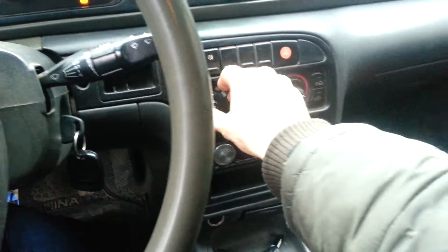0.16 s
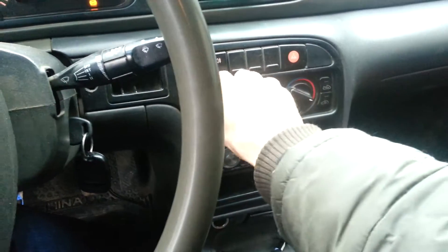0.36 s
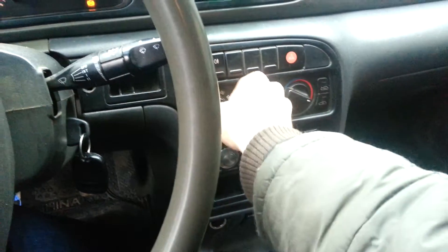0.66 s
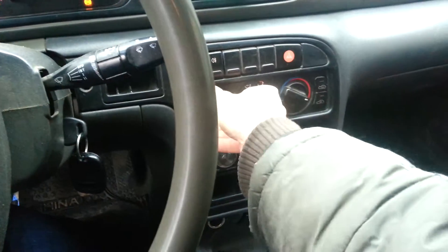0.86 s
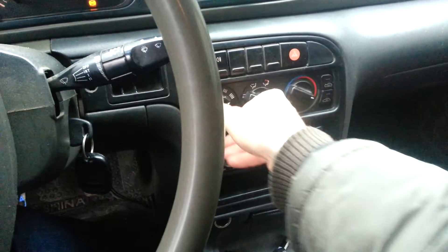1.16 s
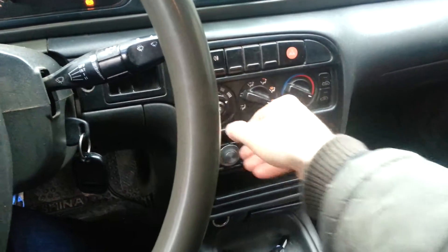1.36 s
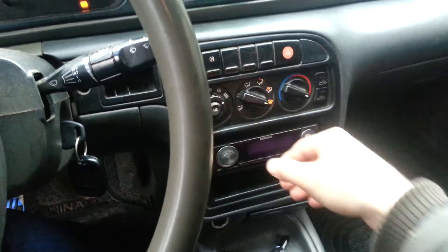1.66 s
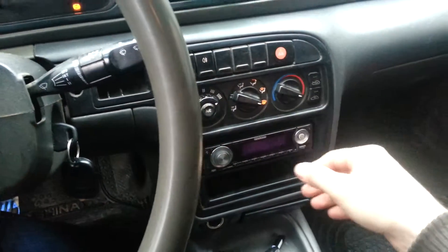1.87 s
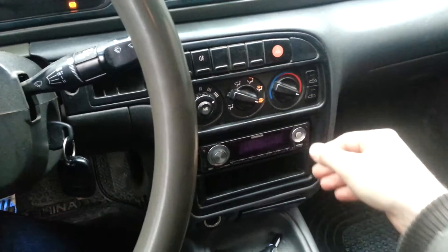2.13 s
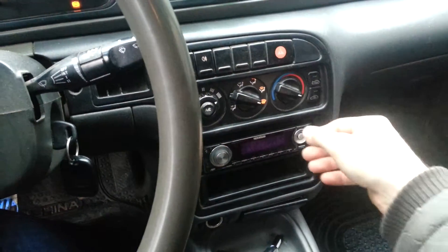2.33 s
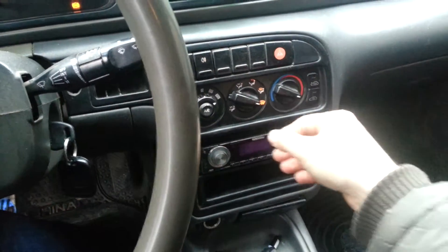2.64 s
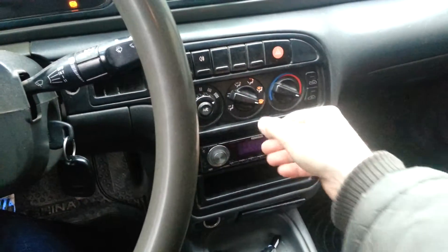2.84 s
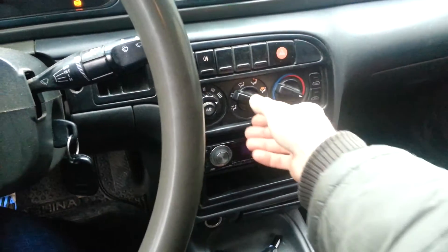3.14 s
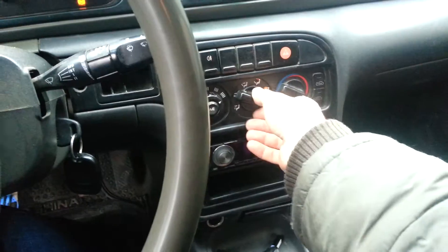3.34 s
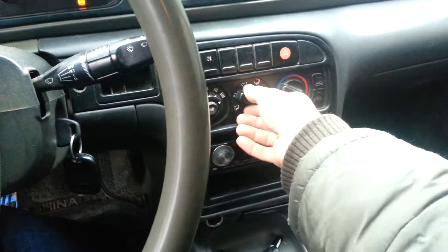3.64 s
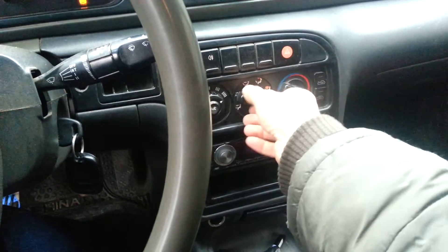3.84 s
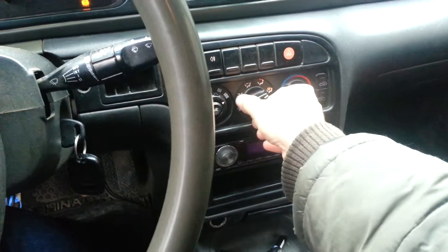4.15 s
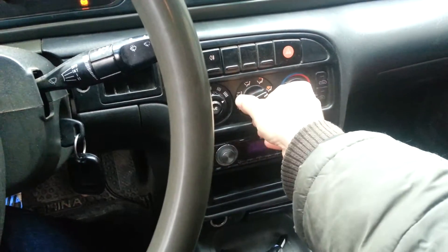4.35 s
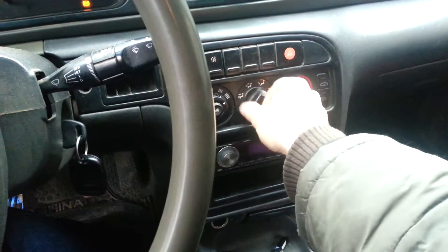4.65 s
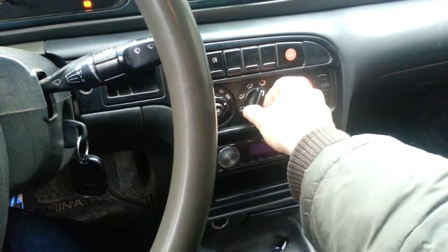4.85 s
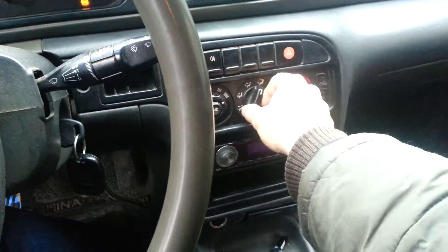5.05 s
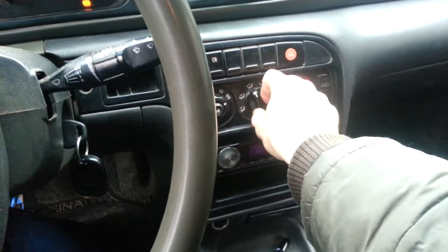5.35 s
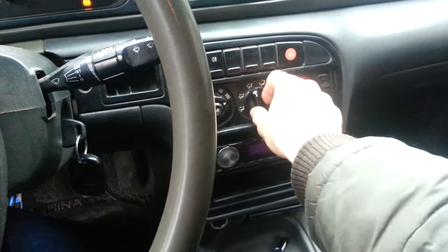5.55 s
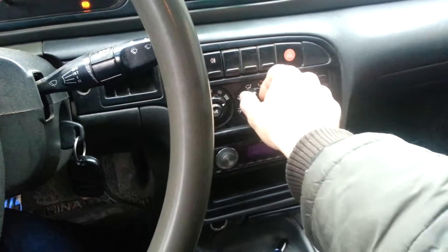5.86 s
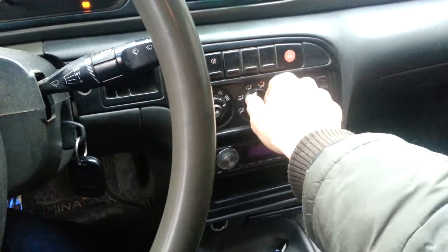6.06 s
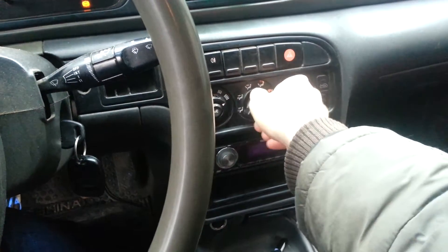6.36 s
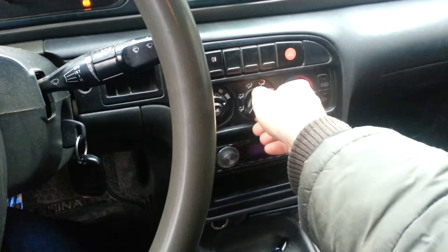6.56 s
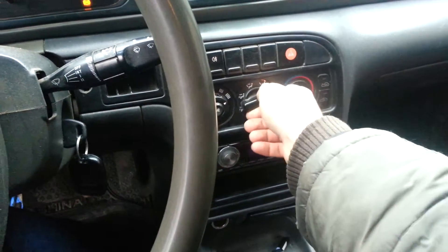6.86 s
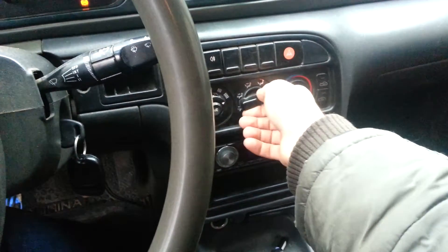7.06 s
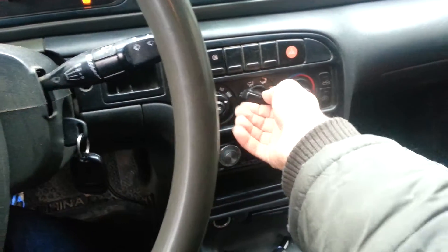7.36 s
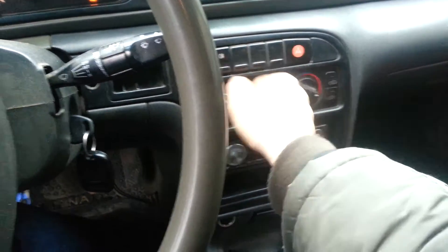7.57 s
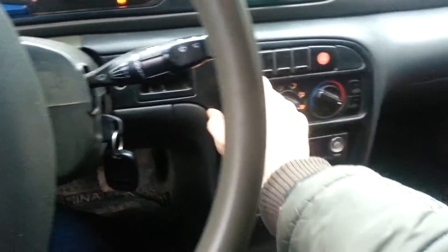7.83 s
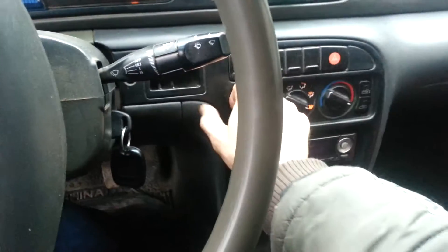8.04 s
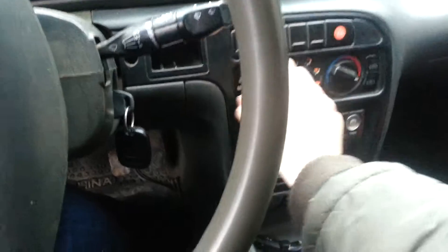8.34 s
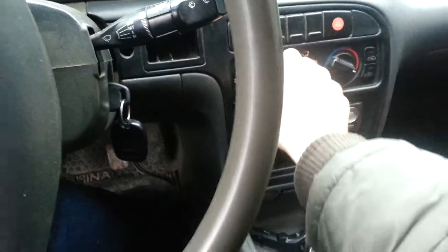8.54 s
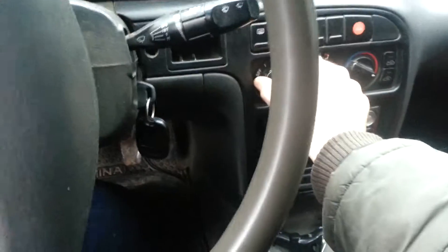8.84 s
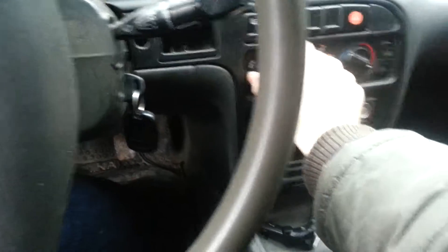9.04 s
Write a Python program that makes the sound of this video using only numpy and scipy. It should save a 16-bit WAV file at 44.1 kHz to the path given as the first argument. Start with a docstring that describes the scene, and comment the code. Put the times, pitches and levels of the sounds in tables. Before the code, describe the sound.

Heard in stereo from the driver's seat, an engine idles with very low, quiet tones under soft cabin noise. At about 0.5, 0.6, 0.7 and 0.8 seconds, four crisp, bright plastic switch clicks sound, each a tight double contact with faint panel thrum. Right after the last, the blower spins up, its pitch gliding upward and settling within about a second into steady hum, broad air rush and light hiss. Small dial ticks begin near 3.8; hard snaps at 3.9, 4.7 and 5.4 carry clustered, hollow flap knocks behind the dashboard, shifting the air's tone. Around 6.2 to 6.5 come ticks, a short scuff, faint spring ping and rattling knocks, with softer knocks at 6.8 and 7.3. The hum changes colour by 7.6; a tiny hard tick falls at 7.7, then a jacket sleeve rustles and fades. A final switch click lands at 9.2, the blower still running.

```python
"""In an idling car, two microphones at the driver's seat hear low engine tones over soft cabin noise. A hand
clicks the fan switch, bursts ringing in its modes; the blower spins up, rotor harmonics over shaped air noise.
Then the vent dial snaps from notch to notch; flaps knock behind the dashboard and share the air out anew. Near
the end the hum's colour shifts, a small hard tick sounds and a jacket sleeve rustles. The hand goes back to the
fan switch for one more click, the blower running on."""
import sys
import numpy as np
from scipy import signal
from scipy.fft import rfft, irfft, next_fast_len
from scipy.io import wavfile
from scipy.ndimage import map_coordinates

SR = 44100
rng = np.random.default_rng(int(sys.argv[2]) if len(sys.argv) > 2 else 0)


def master_out(mix):
    """Clip the mix to full scale and print it as 16-bit PCM to the path in sys.argv[1]."""
    frames = np.transpose(np.atleast_2d(mix))
    ceiling = np.clip(frames, -1, 1)
    pcm = np.round(ceiling * 32767).astype(np.int16)
    wavfile.write(sys.argv[1], SR, pcm)


N = 405719
T = np.arange(N) / SR

# likeness of the two microphones: [f/Hz, correlation 0-1]
LIKENESS = [(40, .95), (100, .975), (290, .94), (640, .78), (1300, .15), (2500, .2), (5000, 0), (15000, 0)]
# left minus right microphone: [f/Hz, level/dB]
BALANCE = [(60, -2.5), (130, 2), (300, 1.5), (700, 1.5), (1100, -3), (1500, -3), (2380, 1), (3100, 3),
           (5000, 5.5), (7000, 7), (8500, 1.5), (10500, -3.5), (12500, -6), (14500, -3)]

# parked cabin, noise spectrum: [f/Hz, relative level/dB per Hz]
CABIN = [(41, -40), (70, -11), (140, -13.5), (180, -5.5), (269, -4.5), (301, -10), (377, -7.5), (480, -7.5),
         (605, -10.5), (647, -10), (866, -12), (1590, -21), (1820, -16), (2030, -22.5), (6110, -29),
         (11000, -30.5), (13700, -31), (15000, -49)]
# tones of the idling engine: [f/Hz, rms level/dB]
IDLE = [(30.5, -60.5), (49.8, -64.5), (61, -59), (91.5, -60.5), (122, -61), (183, -65), (305, -51.5),
        (352, -61), (608, -65)]

# air noise of each duct: [f/Hz, relative level/dB per Hz]
FACE_VENTS = [(50, -24), (100, -13.5), (142, 0), (168, -12.5), (200, -4.5), (240, -2), (400, -4.5),
              (480, -13.5), (600, -6.5), (700, -11.5), (780, -10), (900, -13.5), (1120, -13.5), (1450, -22),
              (2450, -32.5), (3000, -31.5), (8000, -76)]
FOOTWELL = [(50, -31), (100, -2), (138, 2), (168, -13.5), (240, 0), (330, -7.5), (440, -8.5), (560, -14),
            (700, -17), (820, -9.5), (1080, -22), (1550, -23.5), (2400, -35), (3000, -34), (8000, -49)]
GRILLE_HISS = [(1000, -26), (1380, -16), (1480, 0), (1600, -6), (1900, 1), (2170, -7), (2470, 1.5),
               (2680, -11), (3760, -9), (4250, -7), (4600, -4.5), (5000, -9), (5610, -11), (6730, -8),
               (7500, -9.5), (9000, -10.5), (10200, -15), (12400, -21), (13400, -22), (14600, -30),
               (15000, -36)]
HISS_WAVER_DB, HISS_WAVERS_PER_S = 0.72, 12  # turbulence at the grille
# the motor gets current just after the fourth switch step; time constant of its spin-up
MOTOR_ON_S, SPIN_UP_S = 0.8, 0.232
# running speed of the blower: [t/s, speed/turns per s]
RUNNING_SPEED = [(2, 48.95), (6.7, 48.85), (7.6, 49.35), (9.2, 49.6)]
# harmonics of the turning wheel: [multiple of the speed, relative level/dB, change at full shift/dB]
ROTOR_ORDERS = [(2, -13.5, 0), (3, -11, -14), (4, -6, 4.5), (5, 1.15, 0), (6, -4, -1.5), (8, -13.5, -1),
                (10, -13, 0)]
# the hum's colour shifts late in the scene: fourth harmonic stronger, # third much weaker: [t/s, share 0-1]
HUM_SHIFT = [(7.25, 0.1), (7.6, 0.83)]
# resonance of the wheel's housing: [f/Hz, gain/dB]
HOUSING = [(70, -8), (98, 0), (122, -2), (137, 6), (147, 0), (162, -9), (181, -4), (196, 0), (225, 0),
           (245, 0), (270, 2), (294, 0)]

# what each dial position lets through, face to feet: [hum/dB, face vents/dB, footwell/dB], relative
VENT_SETTINGS = [(-33.5, 2.5, -12.5), (-35.5, -4, -1), (-38.5, -3.5, 0.5), (-37.5, -4, -0.5)]
# dial positions in turn, three up and back again: [row of VENT_SETTINGS]
DIAL_PATH = [0, 1, 2, 3, 2, 1, 0]
# moments at which the flaps swing over: [t/s]
FLAP_SWINGS = [3.944, 4.71, 5.356, 6.406, 6.804, 7.308]
FLAP_TRAVEL_S = 0.025

# a flap's seal scuffs: [t/s, rise/s, relative level/dB]
FLAP_SCUFFS = [(6.349, 0.03, -31), (7.038, .03, -37), (7.248, 0.05, -34)]
SCUFF_RELEASE_S = 0.03
# flaps and linkage hit their stops: [t/s, relative level/dB, brightness/dB per octave]
FLAP_KNOCKS = [(3.9445, -18, 5.5), (3.957, -26, 4), (3.95, -21, -1.5), (3.975, -19, 2), (3.983, -21.5, 2.5),
               (3.993, -26, -1), (4.022, -21.5, 0.5), (4.053, -29, -4.5), (4.694, -18.5, 0),
               (4.7075, -13.5, 3.5), (4.718, -19.5, 4), (4.729, -24, -2), (4.754, -19.5, 2.5),
               (4.784, -23, 1), (4.849, -29, -1.5), (5.321, -31.5, 7), (5.36, -25, 0), (5.373, -24, 1),
               (5.383, -21.5, 4.5), (5.398, -23.5, 3), (5.415, -23, 5), (5.423, -25.5, 4.5),
               (5.437, -29, 2.5), (6.178, -29, 3), (6.384, -25, 2.5), (6.397, -20.5, 3.5), (6.404, -17, -3),
               (6.4105, -16, 2), (6.415, -21, 5.5), (6.437, -22.5, 0), (6.444, -21, -1), (6.483, -33, 7),
               (6.507, -25.5, -2), (6.804, -21.5, 3.5), (6.811, -26, 2), (7.309, -20.5, 0), (7.317, -28, 2),
               (7.329, -31, 3.5)]
# dense ringing of the flaps, dulled by the dashboard: [f/Hz, relative level/dB per Hz]
FLAP_BODY = [(60, -41), (140, -2), (300, 7), (600, -0.5), (700, -2), (880, 0), (1200, -7), (1550, -11.5),
             (2300, -16), (3100, -25.5), (7000, -37.5), (14000, -55)]
# clearest modes of the flaps and their box: [f/Hz, relative level/dB, t60/s]
FLAP_MODES = [(137, -9, 0.085), (284, -7.5, 0.1), (348, -16, 0.08), (560, -8, .05), (855, -10.5, 0.054),
              (965, -9, .04), (1075, -7.5, 0.035), (1255, -14, 0.035), (1640, -15, .035),
              (2004, -17.5, 0.04), (2340, -20, 0.04), (2810, -21, .04)]

# the sleeve is loudest as the arm moves across, then settles
SLEEVE_S, SLEEVE_DB, SLEEVE_RISE_DB_PER_S, SLEEVE_FALL_DB_PER_S = 7.75, -50, 60, 12

# the dial's spring pings: [t/s, relative level/dB]
SPRING_PINGS = [(6.347, -39), (6.3715, -35)]
# modes of the spring: [f/Hz, relative level/dB, t60/s]
SPRING_MODES = [(3700, 1, 0.055), (5280, -6, .035)]
# a small hard tick as the hand leaves the dial: [t/s, relative level/dB]
HARD_TICKS = [(7.699, -35), (7.704, -35)]
# modes of the hard tick: [f/Hz, relative level/dB, t60/s]
HARD_TICK_MODES = [(1600, -6, .02), (2030, 0, .028), (2320, 0, .035), (3100, -6, .015), (3500, -8, .012),
                   (4030, -5, .02), (4700, -5, .02)]

# the vent dial snaps into a notch: [t/s, relative level/dB, brightness/dB per octave]
DIAL_SNAPS = [(3.942, -15.5, 1), (4.692, -15, 2.5), (5.3545, -13.5, 1.5)]
# the dial ticks in its play and as it is eased back: [t/s, relative level/dB, brightness/dB per octave]
DIAL_TICKS = [(3.77, -26, -0.5), (3.883, -33, -7), (3.889, -34, -2.5), (3.95, -32, -8), (4.078, -35, -2),
              (4.6857, -28.5, -4), (6.012, -42, -1), (6.177, -20, -2), (6.371, -30, -3), (6.405, -27, -3.5),
              (6.411, -25.5, -3.5), (6.78, -32, -4.5), (6.804, -27, -6.5), (7.702, -42, -4)]
# dense ringing of the dial: [f/Hz, relative level/dB per Hz]
DIAL_BODY = [(200, -34), (900, 7), (1700, 12.5), (2400, 8), (3000, 5), (3700, 10.5), (6000, 6), (8000, 8.5),
             (10000, 8.5), (12300, 7.5), (14500, 5.5)]
# clearest modes of the dial: [f/Hz, relative level/dB, t60/s]
DIAL_MODES = [(1250, -17, .025), (1800, -15, .03), (2400, -11, .023), (4400, -13, .024), (6870, -16, .04),
              (8600, -7.5, .02), (9800, -11, .015), (12300, -3, .012), (13050, -4, .018)]

# steps of the fan switch: [t/s, relative level/dB, brightness/dB per octave, knob rebounds after/s]
SWITCH_STEPS = [(0.5132, -20.5, 2, 0.015), (0.5983, -15.5, 1.5, 0.016), (0.7078, -15, 0.5, 0.016),
                (.792, -16, 0, .0185), (9.189, -15.5, 1, .016)]
REBOUND_DB, REBOUND_BRIGHT_DB = -4, -1.5  # level against the step; dB per octave
# the fan knob ticks in its play: [t/s, relative level/dB, brightness/dB per octave]
KNOB_TICKS = [(.116, -44, -7), (0.634, -36, -4), (0.6571, -26, -3.5), (0.738, -32, 0),
              (0.8849, -27.5, -5.5), (.888, -33.5, -6.5)]
# dense ringing of the switch: [f/Hz, relative level/dB per Hz]
SWITCH_BODY = [(200, -18), (620, -10), (850, 3.5), (1200, 3.5), (1700, 2), (2550, 5.5), (2950, -2),
               (3800, 5.5), (5400, 9.5), (6800, 4.5), (8400, 6), (9700, 0), (14500, -7)]
# clearest modes of the switch: [f/Hz, relative level/dB, t60/s]
SWITCH_MODES = [(940, -2.5, .035), (1180, -1.5, .03), (1590, -11, .035), (1780, -7, .03), (2280, -3.5, .03),
                (2345, -4, .05), (2525, -2, .03), (2660, -4.5, .045), (3390, -7, .04), (3827, -6.5, .045),
                (4490, -6, .03), (4915, -5, .035), (5305, -6, .03), (5432, -3.5, .04), (6250, -6, .026),
                (6500, -7, .03), (7330, -7.5, .026), (7665, -6.5, .035), (8300, -5, .024),
                (9000, -7.5, .024), (12600, -10, .025), (13500, -9, .03), (14200, -8, .03)]
# dense ringing of the dashboard panel, which answers each step: [f/Hz, relative level/dB per Hz]
PANEL_BODY = [(110, -3), (230, -1.5), (330, -1), (420, -8), (540, -0.5), (700, -14), (1500, -35),
              (8000, -60)]
# modes of the panel: [f/Hz, relative level/dB, t60/s]
PANEL_MODES = [(235, -3, .12), (354, -5, .12), (550, -2, 0.077)]

SIDES = np.array([[1], [-1]])  # left and right microphone
CUTOFF_HZ = 14900


def from_db(db):
    """Decibels to amplitude gain."""
    return 10 ** (np.asarray(db) / 20)


def rms_one(x):
    """Scale to unit rms."""
    return x / np.sqrt(np.mean(x ** 2) + 1e-20)


def in_time(rows):
    """Each column of a curve at every sample."""
    s, *columns = np.transpose(rows)
    return [np.interp(T, s, column) for column in columns]


def at_hz(points, hz):
    """Read a spectrum on a log-frequency axis."""
    known_hz, values = np.transpose(points)
    return np.interp(np.log(hz), np.log(known_hz), values)


def drift(rate):
    """Slow chance from knots of spread 1, rate of them a second."""
    knots = rng.standard_normal(4000)
    coarse = map_coordinates(knots, [T[::50] * rate], order=3, mode="wrap")
    return coarse.repeat(50)[:N]


def noise(spectrum, tilt_db=0, size=N):
    """Coloured noise at the two microphones: alike in the bass, unrelated in the treble; rms 1."""
    padded = next_fast_len(size)
    hz = np.maximum(np.fft.rfftfreq(padded, 1 / SR), 1)
    mid, side = rfft(rng.standard_normal((2, padded)))
    alike = np.clip(at_hz(LIKENESS, hz), -1, 1)
    colour_db = at_hz(spectrum, hz) + tilt_db * np.log2(hz) + SIDES * at_hz(BALANCE, hz) / 2
    pair = np.sqrt(1 + alike) * mid + np.sqrt(1 - alike) * side * SIDES
    return rms_one(irfft(pair * from_db(colour_db), padded)[:, :size])


def ringing(modes, bright_db, age, spread_db=1.0):
    """Decaying sines; strengths differ from touch to touch, and treble phase between microphones."""
    hz, level_db, t60 = np.transpose(modes)
    strength, start, apart = rng.standard_normal((3, len(hz)))
    colour_db = level_db + bright_db * np.log2(hz / hz.mean()) + SIDES * at_hz(BALANCE, hz) / 2
    gain = from_db(colour_db + spread_db * strength)
    phase = np.pi * (start + SIDES * apart * (1 - at_hz(LIKENESS, hz)) / 2)
    waves = np.exp(np.outer(2j * np.pi * hz - np.log(1000) / t60, age))
    return np.imag((gain * np.exp(1j * phase)) @ waves)


def strikes(events, body, modes, modes_db, attack_s, crack_db, crack_t60,
            cabin_t60, cabin_db, cabin_tilt_db, low_hz, size=6500):
    """A contact cracks briefly and sets the part's modes ringing; the cabin adds a tail of tilted colour."""
    out = np.zeros((2, N + 2 * size))
    age = np.arange(size) / SR
    pressed = 1 - np.exp(-age / attack_s)
    crack = np.exp(-np.log(1000) * age / crack_t60)
    tail = from_db(cabin_db) * np.exp(-np.log(1000) * age / cabin_t60) * (1 - crack)
    # the part radiates almost no deep bass
    body = [(low_hz / 10, -70)] + list(body)
    for s, level_db, bright_db in events:
        hit = from_db(crack_db) * crack * noise(body, bright_db, size=size)
        hit += from_db(modes_db) * ringing(modes, bright_db, age)
        hit += tail * noise(body, bright_db + cabin_tilt_db, size=size)
        start = round(s * SR)
        out[:, start:start + size] += from_db(level_db) * pressed * hit
    high_pass = signal.butter(2, low_hz, "high", fs=SR, output="sos")
    return signal.sosfilt(high_pass, out[:, :N])


def pings(events, modes):
    """A small hard part is flicked and rings in its modes alone."""
    out = np.zeros((2, N + SR))
    age = np.arange(SR // 4) / SR
    for s, level_db in events:
        start = round(s * SR)
        out[:, start:start + len(age)] += from_db(level_db) * ringing(modes, 0, age, spread_db=0.5)
    return out[:, :N]


def rattled(events, gap_s, fade_db, count=2):
    """Loose linkage bounces: every knock is followed by weaker ones at uneven gaps."""
    out = []
    for s, level_db, bright_db in events:
        delays = np.cumsum(gap_s * rng.uniform(0.492, 1.5, count))
        out.append((s, level_db, bright_db))
        for bounce, delay in enumerate(delays, start=1):
            out.append((s + delay, level_db + fade_db * bounce, bright_db))
    return out


def seated(events, lead_s, lead_db, lag_s, weaker_db, duller_db):
    """A sprung catch touches the ridge, snaps over it, then drops into its notch, weaker and duller."""
    out = []
    for s, level_db, bright_db in events:
        out.append((s - lead_s, level_db + lead_db, bright_db + duller_db))
        out.append((s, level_db, bright_db))
        out.append((s + lag_s, level_db + weaker_db, bright_db + duller_db))
    return out


def engine():
    """The idling engine drones through the body over a soft cabin noise."""
    drone = np.zeros(N)
    for hz, level_db in IDLE:
        phase = 2 * np.pi * hz * T + 0.085 * drift(1.33)
        drone += from_db(level_db) * np.sqrt(2) * np.sin(phase)
    return drone + from_db(-45.0) * noise(CABIN)


def wheel_speed():
    """Turns per second: the wheel spins up from rest, quickly at first, then ever more slowly."""
    running, = in_time(RUNNING_SPEED)
    powered_s = np.maximum(T - MOTOR_ON_S, 1 / SR)
    return running * (1 - np.exp(-powered_s / SPIN_UP_S))


def air_route():
    """Levels of hum, face vents and footwell: each flap swing glides to the dial's next setting."""
    rows = []
    for s, before, after in zip(FLAP_SWINGS, DIAL_PATH, DIAL_PATH[1:]):
        rows.append((s - FLAP_TRAVEL_S / 2, *VENT_SETTINGS[before]))
        rows.append((s + FLAP_TRAVEL_S / 2, *VENT_SETTINGS[after]))
    return in_time(rows)


def rotor_hum(speed, flutter_db, wobble):
    """The uneven wheel's harmonics glide up with its speed through the housing's resonance."""
    angle = 2 * np.pi * np.cumsum(speed) / SR
    shift, = in_time(HUM_SHIFT)
    hum = np.zeros(N)
    for multiple, level_db, shift_db in ROTOR_ORDERS:
        housing_db = at_hz(HOUSING, multiple * speed)
        gain = from_db(level_db + housing_db + shift * shift_db + flutter_db * drift(10))
        hum += gain * np.sqrt(2) * np.cos(multiple * angle + wobble * drift(25))  # wobble in radians
    return hum


def whistle(centre_hz, width_hz):
    """A thin whistle: noise passed twice through one narrow resonance."""
    radius = np.exp(-np.pi * width_hz / SR)
    poles = [1, -2 * radius * np.cos(2 * np.pi * centre_hz / SR), radius * radius]
    once = signal.lfilter([1], poles, rng.standard_normal((2, N)))
    return rms_one(signal.lfilter([1], poles, once))


def blower():
    """Hum and air grow with the wheel's speed; the flaps share the air between the ducts."""
    speed = wheel_speed()
    hum_db, face_db, foot_db = air_route()
    flow = speed / speed.max()
    hum = from_db(hum_db) * rotor_hum(speed, flutter_db=1.5, wobble=0.08)
    face = from_db(face_db - 35.5) * noise(FACE_VENTS)
    footwell = from_db(foot_db - 34.0) * noise(FOOTWELL)
    hiss = from_db(-48.5 + HISS_WAVER_DB * drift(HISS_WAVERS_PER_S)) * noise(GRILLE_HISS)
    whine = from_db(-69) * whistle(centre_hz=13060, width_hz=130)
    return flow ** 3.3 * hum + flow ** 2.75 * (face + footwell) + flow ** 3.5 * (hiss + whine)


def scuffs():
    """A flap's seal drags over its frame, louder and louder until it lets go."""
    envelope = np.zeros(N)
    for s, rise_s, level_db in FLAP_SCUFFS:
        corners = [s, s + rise_s, s + rise_s + SCUFF_RELEASE_S]
        envelope += from_db(level_db) * np.interp(T, corners, [0, 1, 0])
    return envelope * from_db(2.1 * drift(150)) * noise(FLAP_BODY, tilt_db=2.0)


def flaps():
    """The flaps and their loose linkage knock behind the dashboard."""
    knocks = rattled(FLAP_KNOCKS, gap_s=0.0045, fade_db=-3.8)
    return from_db(1.5) * strikes(
        knocks, FLAP_BODY, FLAP_MODES, modes_db=-0.5, attack_s=0.0011, crack_db=0.5, crack_t60=0.026,
        cabin_t60=0.15, cabin_db=-12.5, cabin_tilt_db=-0.5, low_hz=135)


def sleeve():
    """Jacket cloth rises quickly and fades slowly, fluttering."""
    age = T - SLEEVE_S
    level_db = SLEEVE_DB + np.minimum(SLEEVE_RISE_DB_PER_S * age, -SLEEVE_FALL_DB_PER_S * age)
    return from_db(level_db + 1.3 * drift(25)) * noise(GRILLE_HISS, tilt_db=1.5)


def vent_dial():
    """The dial's sprung catch snaps from notch to notch, with ticks in its play."""
    snaps = seated(DIAL_SNAPS, lead_s=0.0028, lead_db=-6.0, lag_s=0.0055, weaker_db=-13, duller_db=-1.0)
    return strikes(
        snaps + DIAL_TICKS, DIAL_BODY, DIAL_MODES, modes_db=-2.5, attack_s=0.00023, crack_db=0.55,
        crack_t60=0.041, cabin_t60=0.11, cabin_db=-9.0, cabin_tilt_db=-1.5, low_hz=280)


def fan_switch():
    """Each step is a thin, quick run of contacts and a knob rebound; the panel thrums faintly after it."""
    snaps = [row[:3] for row in SWITCH_STEPS]
    steps = seated(snaps, lead_s=0.0028, lead_db=-21.0, lag_s=0.0044, weaker_db=-1.5, duller_db=-1.0)
    rebounds = [(s + after_s, level_db + REBOUND_DB, REBOUND_BRIGHT_DB)
                for s, level_db, _, after_s in SWITCH_STEPS]
    clicks = strikes(
        steps + rebounds + KNOB_TICKS, SWITCH_BODY, SWITCH_MODES, modes_db=-8.5, attack_s=0.0002,
        crack_db=1.5, crack_t60=0.019, cabin_t60=0.11, cabin_db=-8.0, cabin_tilt_db=-3.5, low_hz=560)
    panel_pushes = [(s, level_db, 0) for s, level_db, _ in snaps]
    thrum = strikes(
        panel_pushes, PANEL_BODY, PANEL_MODES, modes_db=-15, attack_s=0.021, crack_db=-30,
        crack_t60=0.02, cabin_t60=0.32, cabin_db=-14, cabin_tilt_db=1.5, low_hz=100)
    return clicks + thrum


def hand():
    """All that the hand sets off: flaps, sleeve, small pings, dial detents and switch steps."""
    behind_dashboard = scuffs() + flaps()
    small_parts = pings(SPRING_PINGS, SPRING_MODES) + pings(HARD_TICKS, HARD_TICK_MODES)
    return behind_dashboard + sleeve() + small_parts + vent_dial() + fan_switch()


def scene():
    """Everything heard from the driver's seat."""
    return engine() + blower() + hand()


def record(dry):
    """The microphones' top is cut steeply by an elliptic low-pass."""
    low_pass = signal.ellip(10, 0.2, 80, CUTOFF_HZ, fs=SR, output="sos")
    return signal.sosfilt(low_pass, dry)


dry = scene()
out = record(dry)
master_out(out)
```